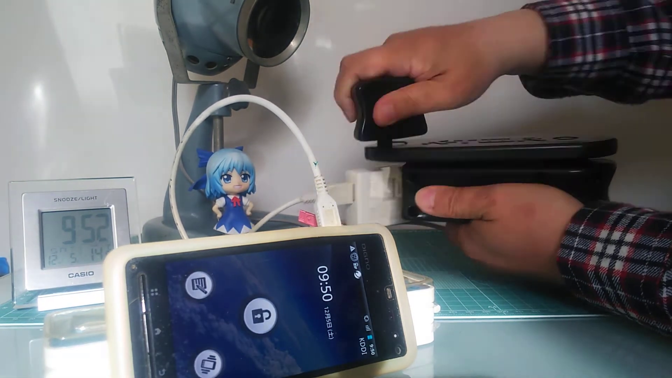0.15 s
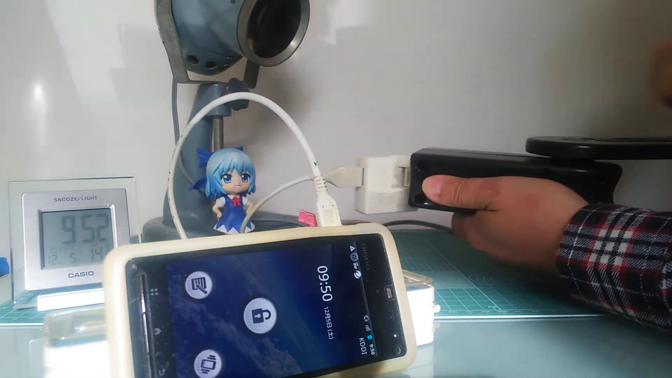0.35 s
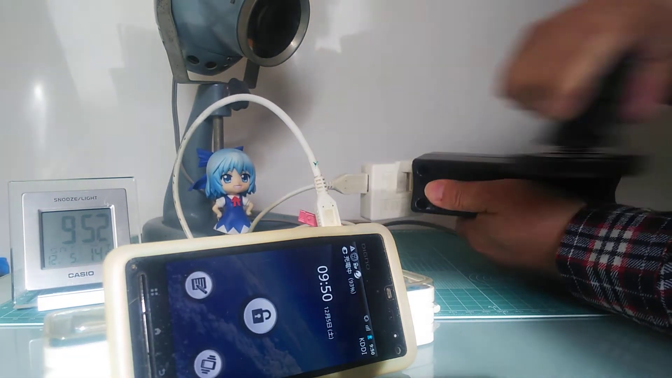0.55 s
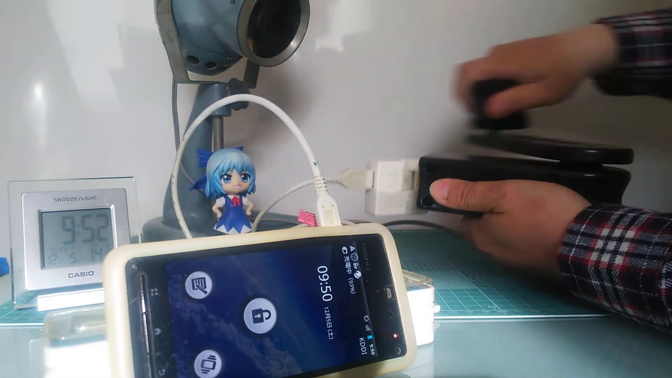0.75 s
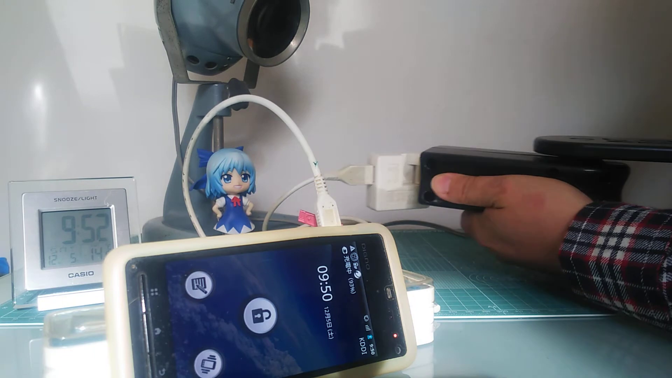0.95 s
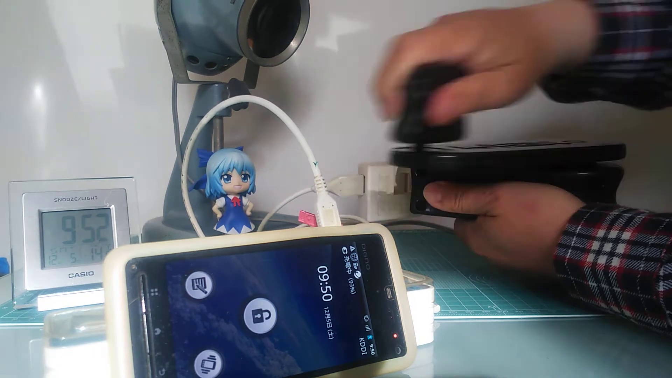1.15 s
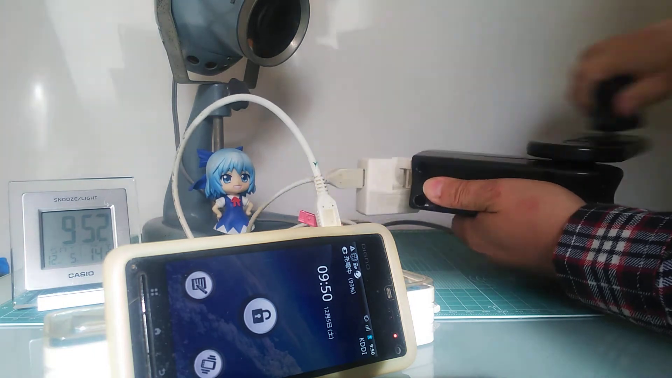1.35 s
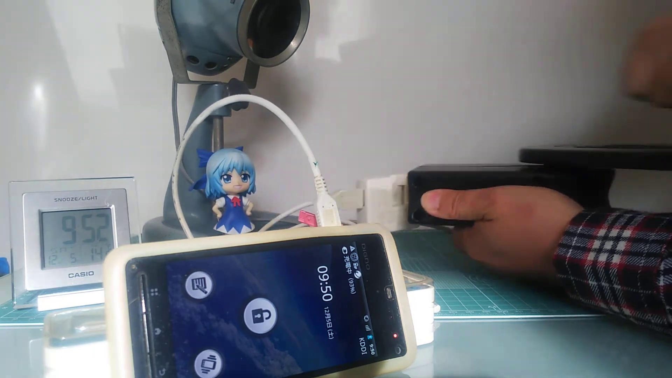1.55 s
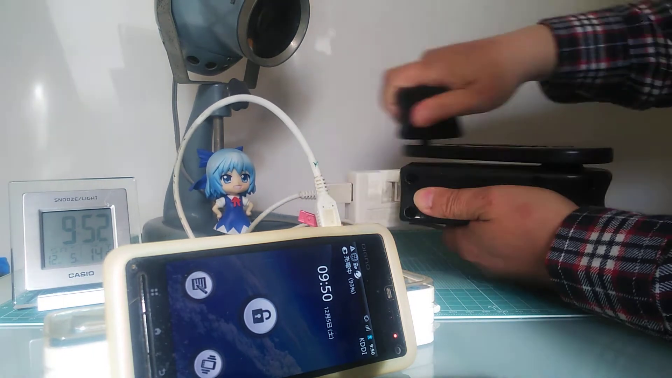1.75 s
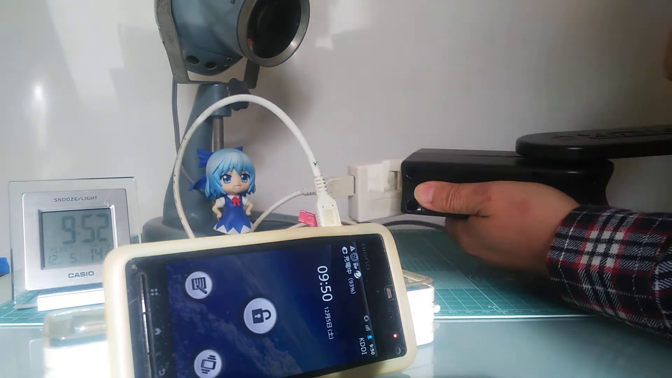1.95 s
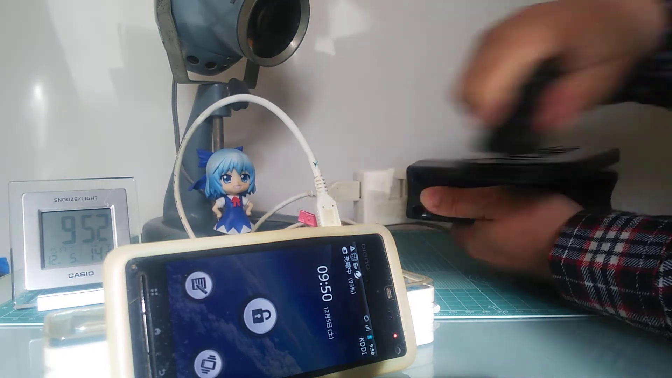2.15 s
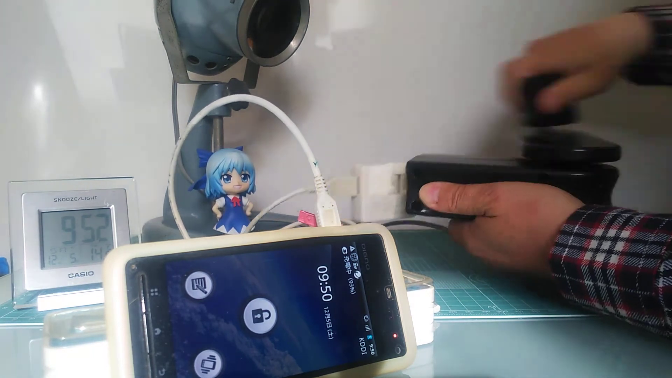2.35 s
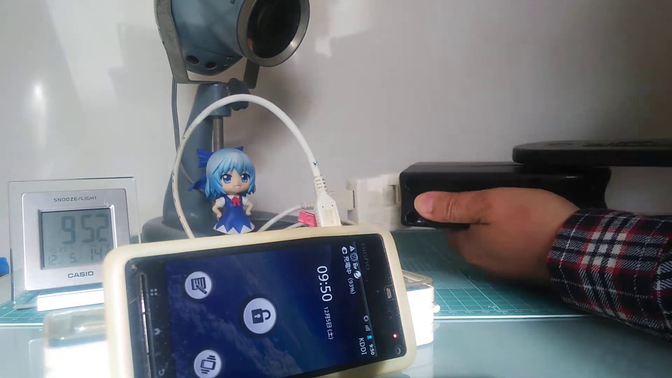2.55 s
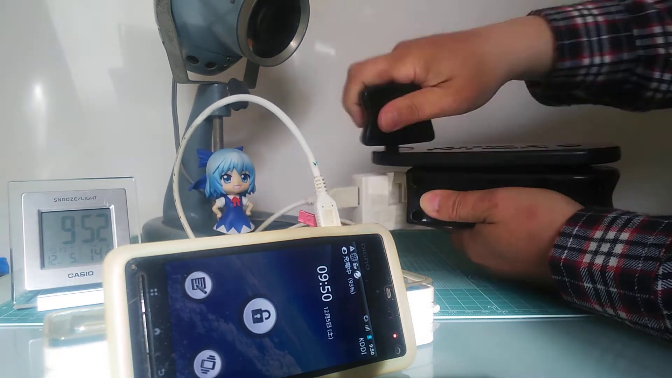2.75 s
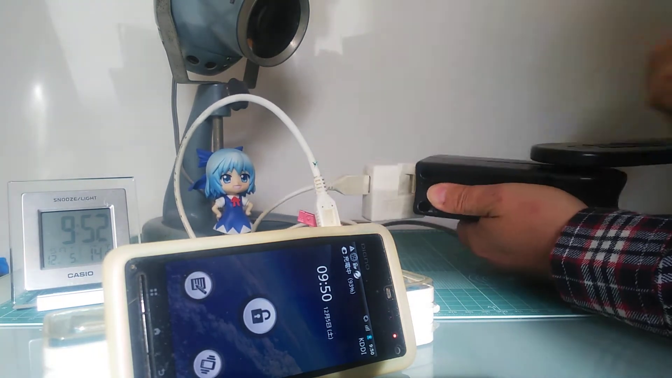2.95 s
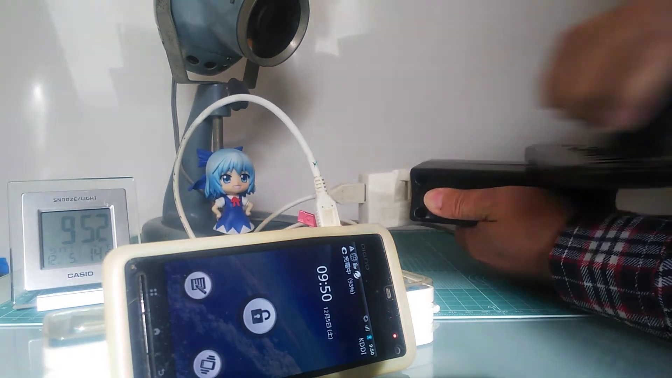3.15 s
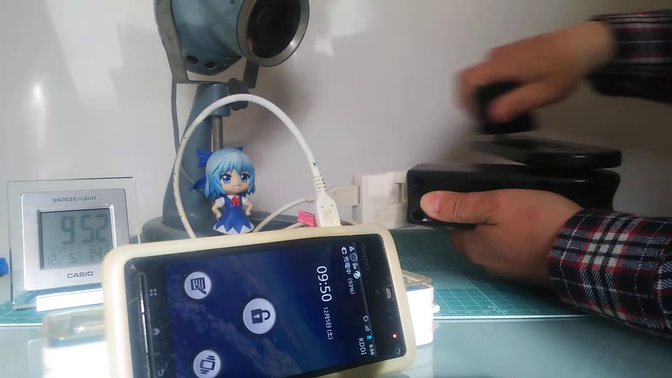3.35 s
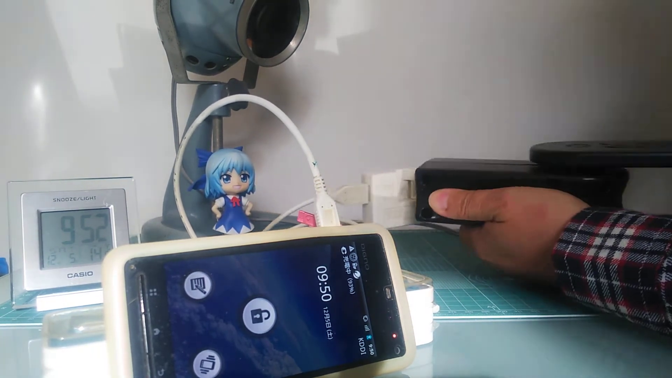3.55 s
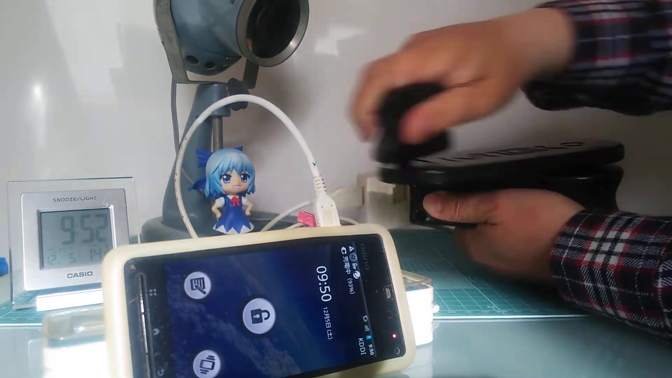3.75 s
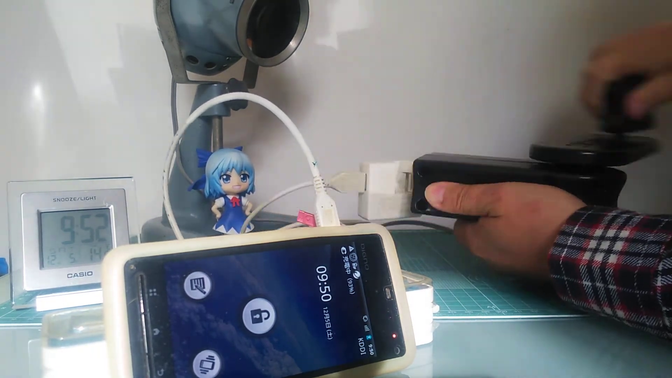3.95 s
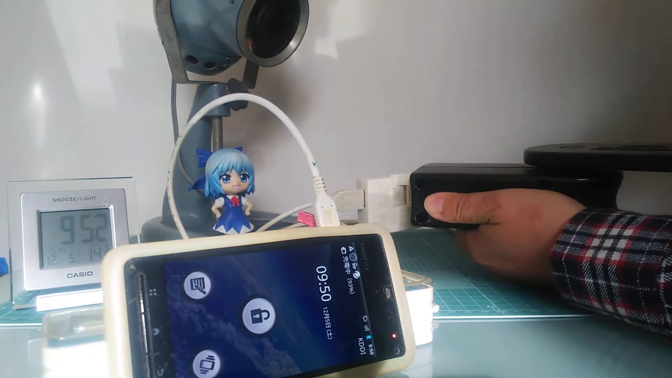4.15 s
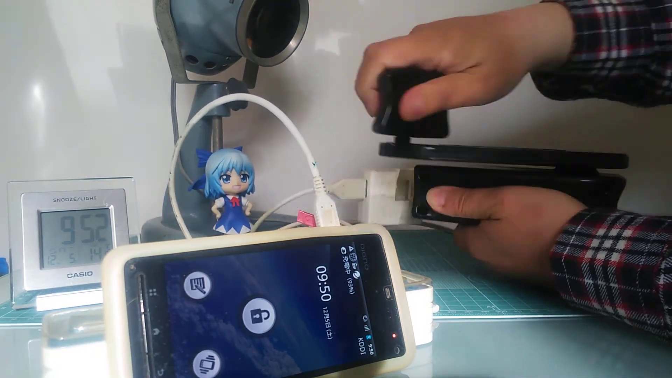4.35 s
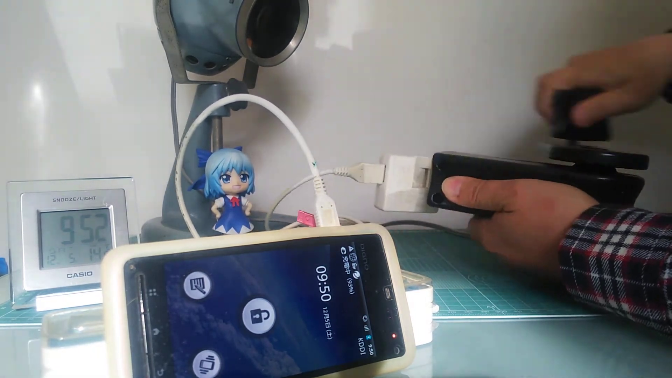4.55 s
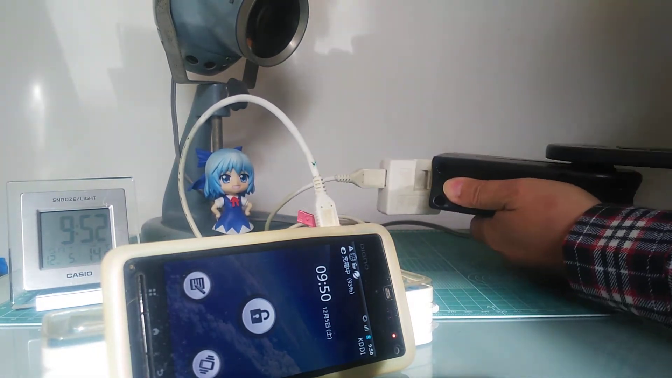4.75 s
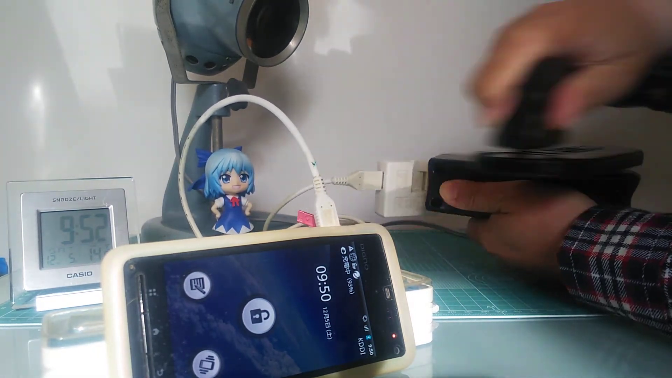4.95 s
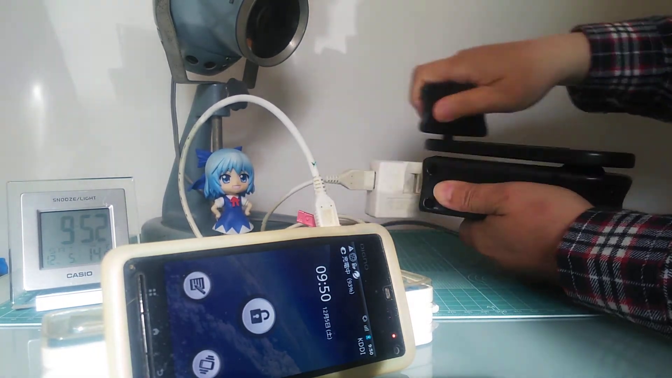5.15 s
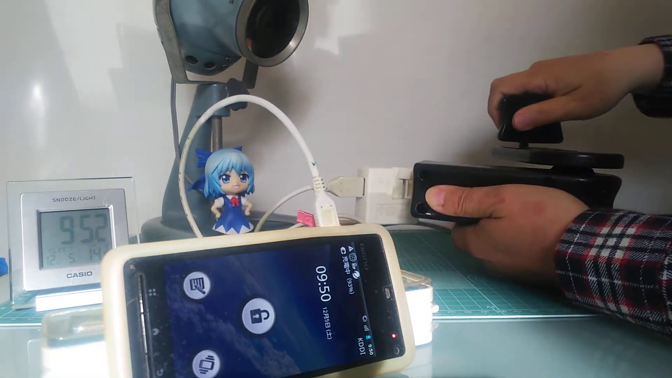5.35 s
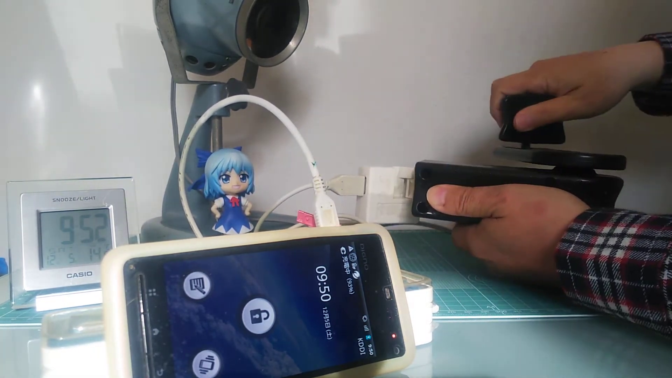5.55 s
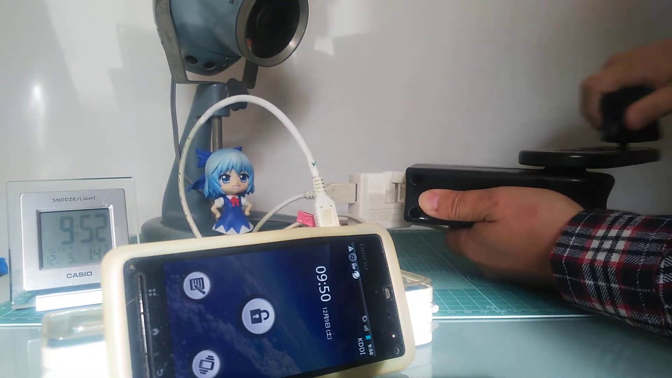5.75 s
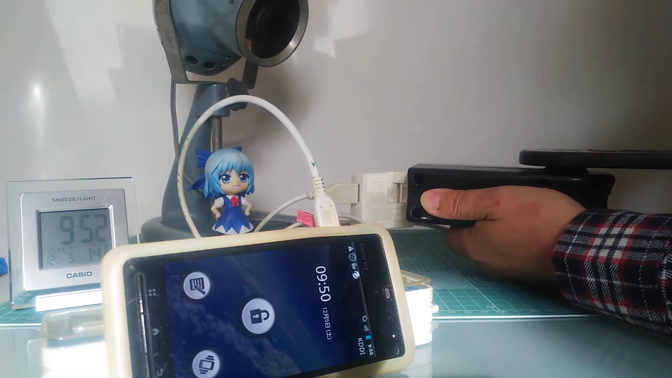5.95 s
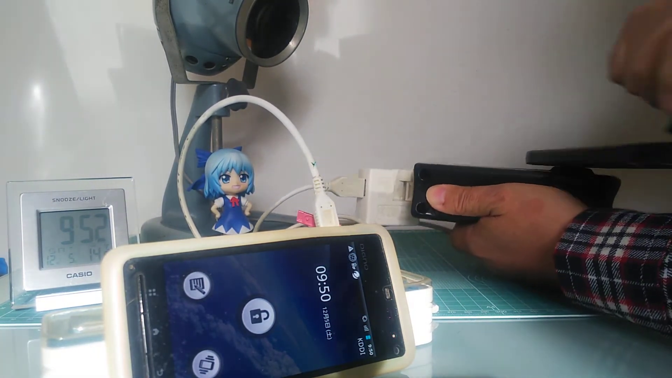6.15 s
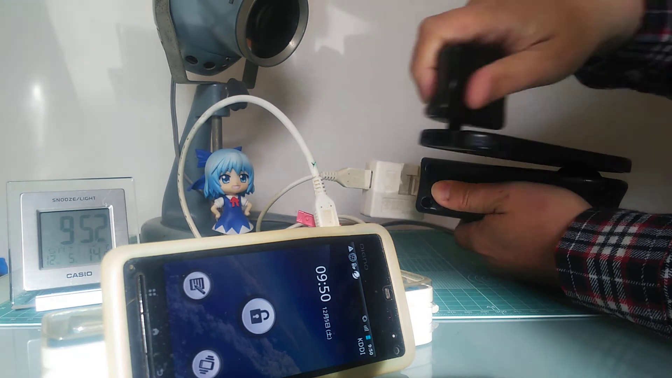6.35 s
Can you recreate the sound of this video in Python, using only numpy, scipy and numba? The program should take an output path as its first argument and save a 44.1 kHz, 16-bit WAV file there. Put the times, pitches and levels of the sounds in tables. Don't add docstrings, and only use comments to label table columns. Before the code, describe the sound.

A hand-crank generator is already turning at full pace at 0 s, close to the microphones in a small quiet room. Dense gear chatter in a hollow plastic case makes a loud, gritty whirr, with a nasal whine gliding up and down. Each turn has two surges, a stronger and a weaker one, roughly every 0.2 to 0.3 s, with brief dips where the hand reverses. A bright crack comes near 0.3 s; hard tooth knocks scatter throughout, strongest around 2.7, 3.2 and 3.7 s. Soft low table bumps come near 3.1, 3.3 and 4.4 s. From 4.3 s the strokes slow and weaken, with a last push around 5 s. At about 5.25 s the sound falls off sharply to faint room rumble and hiss, with a dull tick near 5.5 s. From 5.7 s to the end at about 6.4 s, a quieter, lower, slow spin clicks about twenty-three times a second.

```python
import sys
import numpy as np
from scipy import signal
from scipy.fft import rfft, irfft
from scipy.io import wavfile
from scipy.ndimage import uniform_filter1d, minimum_filter1d
from numba import njit

SR = 44100
rng = np.random.default_rng(int(sys.argv[2]) if len(sys.argv) > 2 else 0)


def output_pcm(signal):
    pcm = np.clip(np.atleast_2d(signal).T, -1, 1) * 32767
    wavfile.write(sys.argv[1], SR, np.round(pcm).astype(np.int16))


def natural_amplitude(level_db):
    exponent = np.asarray(level_db, float) / 20
    return 10 ** exponent


N = 282240

# dead point in seconds, mesh rate there in Hz, fastest moment in seconds, mesh rate there in Hz,
# whine level in dB.
STROKES = [(-.06, 703, 0.1, 1093, 1), (.28, 735, 0.38, 873.6, -4), (.455, 580.5, 0.61, 960, 1.5),
           (.77, 617.3, 0.9, 865, 1), (.98, 619.4, 1.17, 1081, .5), (1.34, 683, 1.46, 785, -1.5),
           (1.5, 580, 1.65, 1057, 1), (1.85, 625.4, 1.945, 748, 3), (2.01, 556.5, 2.19, 1064, 0),
           (2.41, 621.6, 2.49, 739.7, .3), (2.57, 603.5, 2.73, 1133, 0), (2.91, 624.5, 2.95, 794.6, 2),
           (3.06, 590, 3.21, 1185, -1), (3.4, 571.6, 3.51, 770.3, 2.5), (3.58, 545.6, 3.79, 1193, -3),
           (3.97, 650.4, 4.04, 695.4, -6), (4.12, 600.2, 4.33, 1069, 1), (4.55, 635, 4.8, 646, -7),
           (4.78, 529.6, 4.95, 727, 6), (5.31, 327, 5.78, 368, -20)]
# time in seconds, level in dB.
GRIP = [(0, .5), (1.2, 0.36), (2.4, 1.05), (3.7, .4), (4.3, -2.5), (4.8, -0.9), (5.1, -0.8), (5.13, -3),
        (5.22, -2.5), (5.25, -11.5), (5.29, -44.5), (5.6, -36), (5.66, -15), (5.71, -9), (5.9, -10.5),
        (6.1, -13), (6.33, -14.5), (6.4, -18)]
# time in seconds, size in dB.
JOLTS = [(0.158, 8), (0.366, 3.5), (0.669, 5), (0.922, 6), (1.183, 3.5), (1.451, 3.5), (1.727, 3.5),
         (1.987, 5.5), (2.231, 3.5), (2.504, 5.3), (2.734, 9), (3.021, 5.4), (3.227, 11.1), (3.513, 5.5),
         (3.765, 8), (4.055, 9.5), (4.353, 2.5), (4.709, 6.5), (5.041, 5)]
# time in seconds, depth in dB.
SLACK = [(0.241, 8), (0.455, 6.5), (0.986, 11.5), (1.523, 4), (2.054, 3.0), (2.56, 5.5), (2.799, 10),
         (3.081, 5.5), (3.298, 16), (3.579, 5.5), (3.854, 9.7), (4.118, 11), (4.811, 10.5)]
# level in dB at 800 Hz mesh, dB per octave of speed, # dB at full
# load, lag in seconds, share of jolt (1 = all), share of slack (1 = all), extra dB when slow.
RATTLE_LAW = (-25.5, 10, 0.57, 0.01, 1, 1.01, 0.7)
BODY_LAW = (-28.9, 5.5, 2, .002, -.08, 0.04, .8)
SIZZLE_LAW = (-39.5, 11, 2.6, .002, .36, .5, -1.5)
WHINE_LAW = (-37.8, 3, 1.5, .001, -.15, .6, -8)
MESH_LAW = (-52.5, 42, 3, 0.09, 0.01, .1, 5)
# pitch in Hz, width in Hz, level in dB, extra dB at low speed, likeness of the microphones (0-1).
BODY = [(335, 270, -22, -0.5, 0.67), (461, 215, -20.5, -5, 0.74), (590, 188, -17, 0, 0.7),
        (818, 146, -10.5, 4.5, 0.57), (1055, 125, -4.5, 4.5, 0.95), (1177, 204, -5.5, 2, 1),
        (1332, 220, -1.5, -5.5, 0.84), (1802, 108, -2, 0, 0.8), (1893, 180, 3, -0.5, 0.84),
        (2194, 144, 2, 2, 0.4), (2325, 204, -5.5, 9, .7)]
SHELL = [(2768, 190, -8, 9.5, 0.84), (3068, 302, 0, 0.5, 0.68), (3182, 166, -2.5, -0.5, 0.93),
         (3449, 156, 1, -2, 0.43), (3736, 190, 2, -1, 0.42), (4142, 150, -4.5, -3.5, 0.13)]
SIZZLE = [(4830, 350, 2.5, -1, 0.1), (5256, 370, -5.5, 1.5, 0.17), (5740, 180, -12.5, -10.5, 0.48),
          (7170, 1870, -10, -5.5, 0.16), (8030, 1860, -14, 3, .1), (10530, 700, -17, -3, .1)]
# multiple of the mesh rate, level in dB.
WHINE = [(.418, -17.5), (.68, -17), (1.36, -4.5), (2, 3), (2.72, -8), (3, -2.5), (3.5, -1.5), (4, -5),
         (4.081, -9.5), (5, -4), (5.44, -3), (6, -2.5)]
# pitch in Hz, width in Hz, level in dB.
HORN = [(437, 250, -7.5), (1130, 89, -9.5), (1400, 218, 2.3), (1848, 340, 1), (2207, 290, -3.5),
        (2860, 460, -12.5), (3510, 410, 5.5)]
# time in seconds, length in seconds, multiple of the mesh rate,
# level in dB.
HUM = [
    (0.587, 0.041, .43, -55),
    (2.703, 0.025, .418, -43.5),
    (3.224, 0.026, .37, -53.5),
    (3.915, 0.037, .555, -42),
]
# time in seconds, strength in dB.
BITES = [(5.71, 6), (5.75, 6), (5.789, 9), (5.83, 7.5), (5.87, 4), (5.908, 10), (5.947, 7), (5.992, 11),
         (6.041, 14), (6.09, 10), (6.135, 6), (6.176, 11), (6.219, 10.5), (6.263, 9.5), (6.308, 9),
         (6.35, 11)]
# time in seconds, peak in dB.
KNOCKS = [(0.0414, -8.5), (0.157, -9.5), (0.267, -13.5), (0.53, -14), (0.5501, -10), (0.6519, -11),
          (0.9328, -13), (1.2047, -13.5), (1.5895, -11), (1.6482, -8), (1.6965, -11.5), (1.714, -13),
          (1.7514, -13), (1.9719, -10), (2.1904, -9), (2.2237, -8), (2.2383, -10.5), (2.6449, -6),
          (2.7434, 0), (2.825, -6.5), (2.8499, -7.5), (3.1235, -7.5), (3.1941, -10), (3.2061, -2),
          (3.6633, -12), (3.7264, -3), (3.7552, -5.5), (3.8832, -12), (4.1654, -16), (4.374, -8)]
# time in seconds, treble peak in dB, middle level above
# the treble in dB.
TICKS = [
    (0.2846, -13, 0),
    (1.6476, -31, 14),
    (2.0088, -33, 6),
    (2.7445, -30, 9),
    (3.8836, -30.5, 20),
    (3.9051, -31.5, 21.5),
    (5.4985, -66, 22.5),
]
# time in seconds, peak in dB, pitch in Hz.
THUDS = [
    (0.299, -56, 45.5),
    (0.899, -59, 44.92),
    (1.079, -56, 45),
    (3.099, -46, 45.15),
    (3.299, -50, 44.94),
    (3.879, -59, 44.9),
    (4.379, -47, 45),
]
# pitch in Hz, left gain in dB, right gain in dB.
MICS = [(100.3, -5, -8), (680, 5, 5.5), (1905, 0.5, 2.5), (2080, -1.5, 5), (2370, 0, 2.5), (3170, -7, 5),
        (3588, -7, 8), (4185, -7, 0), (4660, 2, 1.5), (6510, 10, 5), (7480, 3, -37), (11700, -1, -51.5),
        (12000, -22, -21.5), (14000, -15, -27.5)]
# pitch in Hz, level in dB per Hz.
ROOM_TONE = [(20, -35), (37, 0.5), (70, 2.5), (308, -13.5), (455, -8), (545, -10.5), (1070, -19),
             (3910, -21), (10700, -33), (12200, -27.5), (15900, -49.5), (22000, -120)]


def generator():
    mesh_hz, sing_db = crank()
    mesh_hz = uniform_filter1d(mesh_hz, size=900)
    slow = np.clip((520 - mesh_hz) / 120, 0, 1)
    laws = (RATTLE_LAW, BODY_LAW, SIZZLE_LAW, WHINE_LAW, MESH_LAW)
    rattle_db, body_db, sizzle_db, whine_db, mesh_db = follow(laws, mesh_hz, slow)
    turns = np.cumsum(mesh_hz * (1 + 0.00512 * walk(70))) / SR
    throb_db = pinion_throb(turns, slow)
    rattle = natural_amplitude(rattle_db) * ring(SHELL, natural_amplitude(throb_db), slow, spread_db=3.5)
    body = natural_amplitude(body_db - 2.5) * ring(BODY, natural_amplitude(0.77 * throb_db), slow, spread_db=2.5)
    sizzle = natural_amplitude(sizzle_db - 1.5) * ring(SIZZLE, natural_amplitude(0.67 * throb_db), slow, spread_db=3.5)
    whine = gear_whine(turns, mesh_hz, whine_db + sing_db, mesh_db, throb_db)
    return rattle + body + sizzle + whine + gear_hum(mesh_hz) + table_rumble(slow)


def crank():
    t = np.arange(N) / SR
    dead_s, dead_hz, top_s, top_hz, sing_db = np.transpose(STROKES)
    s = np.append(np.ravel([dead_s, top_s], "F"), N / SR)
    hz = np.append(np.ravel([dead_hz, top_hz], "F"), 360)
    place = np.interp(t, s, np.arange(len(s)))
    eased = np.floor(place) + 0.5 - 0.5 * np.cos(np.pi * (place % 1))
    mesh_hz = np.interp(eased, np.arange(len(s)), hz)
    return mesh_hz, np.interp(t, (dead_s + 2 * top_s) / 3, sing_db)


def follow(laws, mesh_hz, slow):
    t = np.arange(N) / SR
    octaves = np.log2(np.maximum(mesh_hz, 560) / 800)
    load = np.gradient(mesh_hz) * SR / 4000
    jolt = bumps(JOLTS, before_s=0.036, after_s=0.12)
    slack = bumps(SLACK, before_s=0.095, after_s=0.033)
    grip_db = np.interp(t, *np.transpose(GRIP))
    levels = []
    for base_db, octave_db, load_db, lag_s, jolted, slackened, slow_db in laws:
        driven_db = np.interp(t - lag_s, t, octave_db * octaves + load_db * load)
        loosened_db = jolted * jolt - slackened * slack
        levels.append(base_db + driven_db + loosened_db + slow_db * slow + grip_db)
    return levels


def bumps(table, before_s, after_s):
    t = np.arange(N) / SR
    return sum(db * np.exp(-((t - s) / np.where(t > s, after_s, before_s)) ** 2) for s, db in table)


def pinion_throb(turns, slow):
    t = np.arange(N) / SR
    angle = 2 * np.pi * turns / 16
    wobble = np.cos(angle + 0.6) + 0.5 * np.cos(2 * angle + 1.2)
    throb_db = (1 - slow) * 1.79 * (1 + 0.71 * walk(12)) * wobble
    throb_db = throb_db + 1.46 * walk(90) - 1.7 * slow
    for at, db in BITES:
        throb_db += db * np.exp(-np.abs(t - at) / np.where(t > at, 0.011, 0.004))
    return throb_db


def ring(modes, throb, slow, spread_db):
    shared = chatter(spread_db)
    own = [chatter(spread_db), chatter(spread_db)]
    out = np.zeros((2, N))
    for hz, width, db, slow_db, like in modes:
        like = np.clip(like, 0, 1)
        gain = natural_amplitude(db + slow_db * slow + 1.6 * walk(11))
        for k in range(2):
            push = throb * (np.sqrt(like) * shared + np.sqrt(1 - like) * own[k])
            out[k] += gain * svf_twice(push, hz, 1.47 * width) / np.sqrt(width / 150)
    return out / np.sqrt(np.mean(out.mean(axis=0) ** 2))


def chatter(spread_db):
    hard = np.minimum(rng.exponential(size=N), 4.5)
    return unit(rng.standard_normal(N) * natural_amplitude(spread_db * hard))


def gear_whine(turns, mesh_hz, whine_db, mesh_db, throb_db):
    train = sum(natural_amplitude(db + 2.6 * walk(33)) * np.sin(2 * np.pi * k * turns) for k, db in WHINE)
    tones = natural_amplitude(whine_db) * train
    tones = tones + natural_amplitude(mesh_db + 5.3 * walk(24.99)) * np.sin(2 * np.pi * turns)
    coasting = np.clip(np.gradient(mesh_hz) * SR / 1800, -1, 0)
    sings = natural_amplitude(6 * coasting + 0.32 * throb_db)
    return sings * sum(natural_amplitude(db) * svf(tones, float(hz), float(width)) for hz, width, db in HORN)


def gear_hum(mesh_hz):
    t = np.arange(N) / SR
    hum = np.zeros(N)
    for at, length_s, k, db in HUM:
        swell = np.exp(-((t - at) / length_s) ** 2)
        hum += natural_amplitude(db) * swell * np.sin(2 * np.pi * k * mesh_hz[int(at * SR)] * t)
    return hum


def table_rumble(slow):
    shake = svf(rng.standard_normal(N), 96.0, 35.0)
    shake = shake + natural_amplitude(-5.5) * svf(rng.standard_normal(N), 65.0, 40.0)
    shake = svf(shake, 58.0, 110.0)
    return natural_amplitude(-53.5 - 26 * slow) * unit(shake) * natural_amplitude(2 * walk(9.9))


def knocks():
    bite_knocks = [(at, db - 39) for at, db in BITES]
    s, db = np.transpose(KNOCKS + bite_knocks)
    tint_db = 4.0 * rng.standard_normal((len(s), len(SHELL)))
    out = np.zeros(N)
    for k, (hz, width, mode_db, *_) in enumerate(SHELL):
        blows = impulses(s + 0.0008, natural_amplitude(db + tint_db[:, k] + mode_db))
        out += svf(blows, float(hz), 0.52 * width) / width
    return natural_amplitude(60) * out


def ticks():
    s, top_db, mid_db = np.transpose(TICKS)
    fade = np.exp(-np.arange(1500) / SR / 0.0031)
    top = np.convolve(impulses(s, natural_amplitude(top_db)), fade)[:N] * rng.standard_normal((2, N))
    mid_gain = natural_amplitude(0.8 * (top_db + mid_db) - 8.5)
    mid = np.convolve(impulses(s, mid_gain), fade)[:N] * rng.standard_normal(N)
    bright = colour(top, [3000, 7000, 12000, 15000], [-9.5, -3, -9, 9.5])
    return natural_amplitude(-6) * bright + natural_amplitude(8) * svf_twice(mid, 2000, 3300)


def thuds():
    out = np.zeros(N)
    for s, db, hz in THUDS:
        blow = impulses([s], natural_amplitude(db))
        out += natural_amplitude(60) * svf(svf(blow, float(hz), 18.0), float(hz), 25.0)
    return out


def room(x):
    t = np.arange(SR // 2) / SR
    fade = np.exp(-np.log(1000) * t / 0.25)
    tail = rng.standard_normal((2, len(t))) * fade * (t > 0.004)
    tail = tail / np.sqrt(np.sum(tail ** 2, axis=1, keepdims=True))
    return natural_amplitude(-11) * signal.fftconvolve(x, tail, axes=1)[:, :N]


def room_tone():
    mid, side = rng.standard_normal((2, N))
    side = colour(side, [60, 300, 2000], [-7, -4, 0])
    hiss = colour(np.array([mid + side, mid - side]), *np.transpose(ROOM_TONE))
    return natural_amplitude(-61.5) * hiss / np.sqrt(np.mean(hiss.mean(axis=0) ** 2))


def unit(x):
    return x / np.sqrt(np.mean(x ** 2))


@njit
def svf(x, hz, width):
    y, band, low = np.empty(len(x)), 0.0, 0.0
    g, k = np.tan(np.pi * hz / SR), width / hz
    for i in range(len(x)):
        v = (band + g * (x[i] - low)) / (1 + g * (g + k))
        band, low = 2 * v - band, low + 2 * g * v
        y[i] = k * v
    return y


def svf_twice(x, hz, width):
    return svf(svf(x, float(hz), float(width)), float(hz), float(width))


def colour(x, hz, db):
    f = np.fft.rfftfreq(N, 1 / SR) + 1
    return irfft(rfft(x) * natural_amplitude(np.interp(np.log(f), np.log(hz), db)), N)


def walk(rate):
    k = int(SR / rate)
    held = np.repeat(rng.standard_normal(N // k + 1), k)
    return 1.352 * uniform_filter1d(uniform_filter1d(held, k), k)[:N]


def impulses(times, gains):
    x = np.zeros(N)
    x[(np.asarray(times) * SR).astype(int)] = gains
    return x


def scene():
    near = generator() + knocks() + ticks()
    hz, left_db, right_db = np.transpose(MICS)
    heard = near + room(near)
    left = np.roll(colour(heard[0], hz, left_db), 4)
    right = colour(heard[1], hz, right_db)
    return np.array([left, right]) + thuds() + room_tone()


def top_cut(x):
    return signal.sosfilt(signal.butter(12, 14255, fs=SR, output="sos"), x)


def record(dry):
    gain = 1 / np.maximum(np.abs(dry).max(axis=0), 1)
    gain = uniform_filter1d(minimum_filter1d(gain, size=201), size=101)
    return top_cut(dry * gain)


dry = scene()
out = record(dry)
output_pcm(out)
```